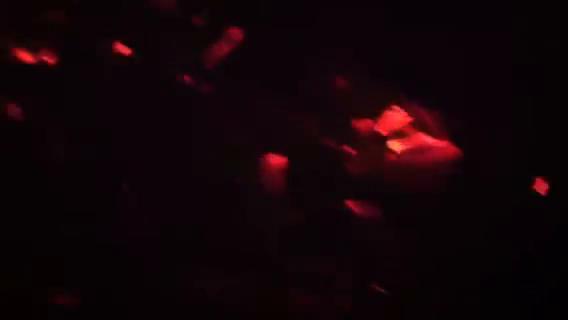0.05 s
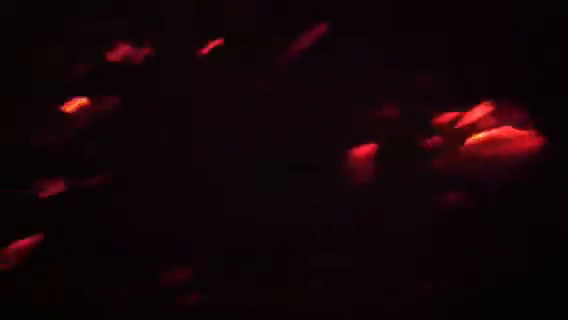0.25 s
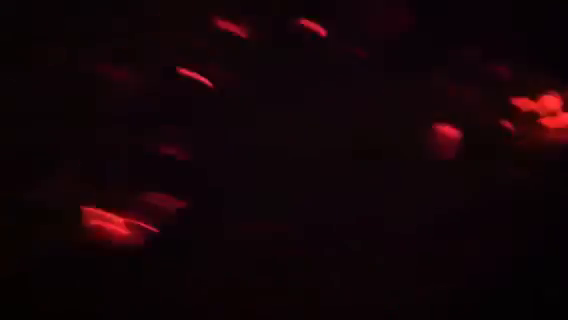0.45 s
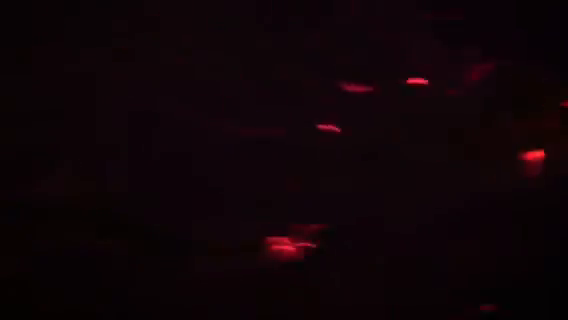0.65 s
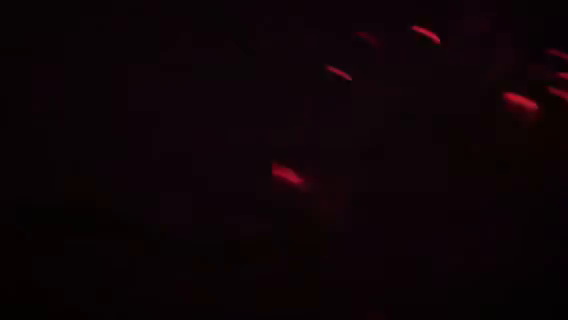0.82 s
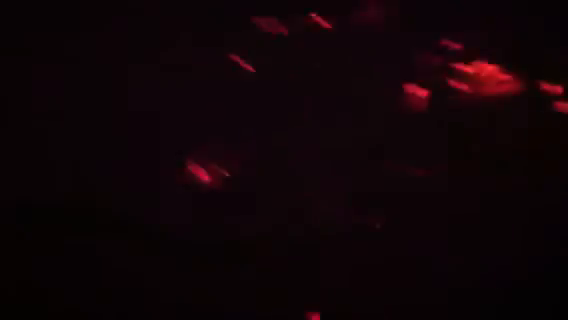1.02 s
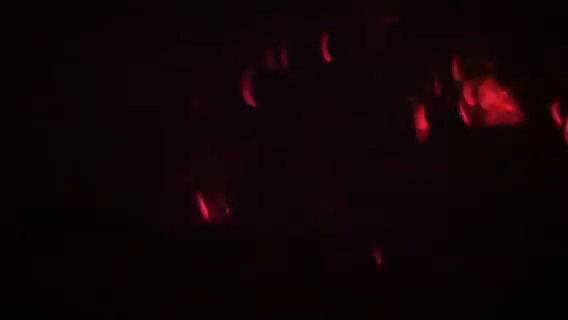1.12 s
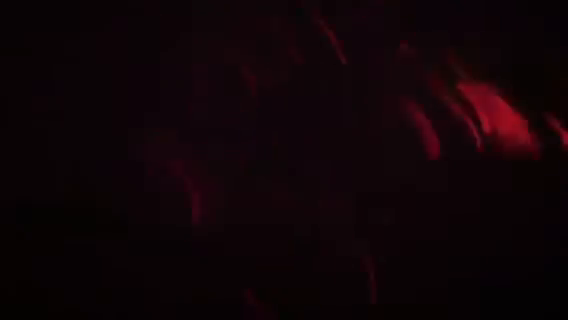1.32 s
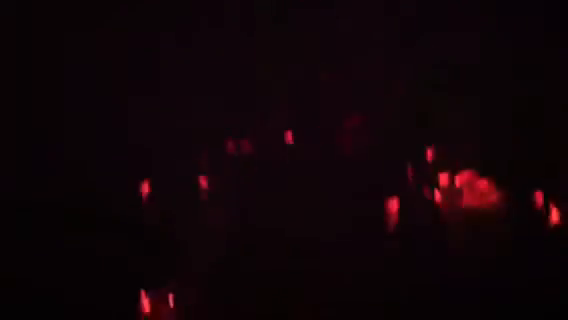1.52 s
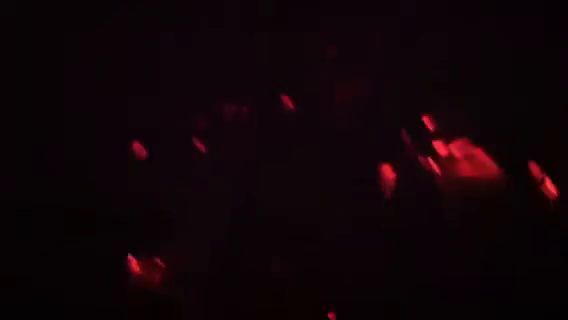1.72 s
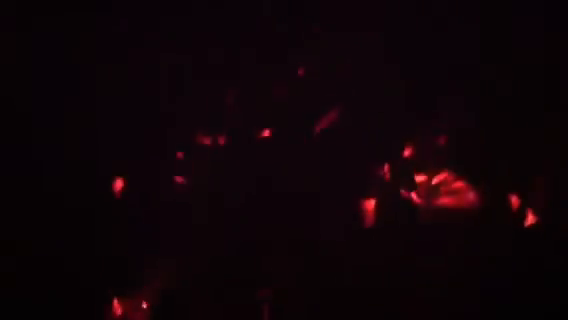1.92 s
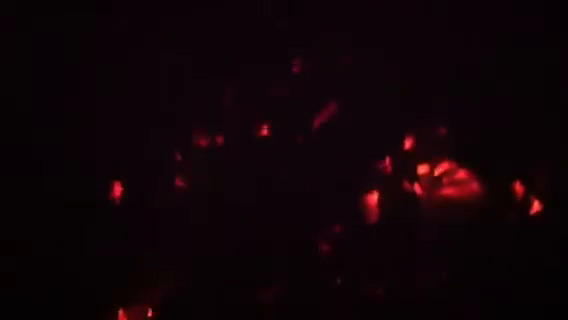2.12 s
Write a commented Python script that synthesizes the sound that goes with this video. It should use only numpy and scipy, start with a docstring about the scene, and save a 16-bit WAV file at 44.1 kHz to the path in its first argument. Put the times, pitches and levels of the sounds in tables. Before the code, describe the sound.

A short rumbling rub on the microphone, then soft swishes and faint ember ticks.

```python
"""Glowing embers at night. A distant low drone is there from the start, and a thin outdoor hiss comes up
over the first second. Almost at once something drags over the body of a hand-held camera: it sticks and
slips in one short, rumbling rub that brightens and lets go with a click. Soft swishes follow, probably
a sleeve. From 0.7 seconds on the embers tick as they crack, and the last tick comes just before the end."""
import sys
import numpy as np
from scipy import signal
from scipy.fft import rfft, irfft, next_fast_len
from scipy.io import wavfile
from scipy.ndimage import map_coordinates

SR = 44100
rng = np.random.default_rng(int(sys.argv[2]) if len(sys.argv) > 2 else 0)


def unload_wav(signal):
    """Save mono or channel-first audio to the path in sys.argv[1] as 16-bit WAV at rate SR, clipped to [-1, 1]."""
    wavfile.write(
        sys.argv[1],
        SR,
        np.round(np.clip(np.atleast_2d(signal).T, -1, 1) * 32767).astype(np.int16),
    )


N = 94815


def rub():
    """Something drags over the casing: coarse catches shake it, finer ones scrape and scuff."""
    # Each row: time in seconds, then relative levels in dB of the judder, the scrape and the scuff.
    levels = [(0.165, -68, -75, -95), (0.18, -39, -56, -69), (0.2, -32.5, -48.5, -62),
              (0.232, -37.5, -53, -69), (0.248, -19, -38, -52), (0.262, -22, -27, -41.5),
              (0.273, -23.5, -22.5, -40.5), (0.282, -28, -25, -41.5), (0.295, -13.5, -21.5, -33),
              (0.306, -25, -26, -31.5), (0.321, -36.5, -31.5, -32.5), (0.328, -22, -28.5, -37.5),
              (0.333, -40, -47, -56), (0.34, -48, -66, -67)]
    # The tone of the middle scrape and of the high scuff. Each row: frequency in Hz, level in dB.
    scrape_tone = [(200, -50), (550, 3), (800, -2.5), (1300, -2.5), (2400, -18.5), (3500, -34), (8000, -47)]
    scuff_tone = [(1000, -14.5), (2200, 5.5), (2900, 1), (4500, -6), (8000, -19), (11000, -32),
                  (15000, -44)]
    low_db, middle_db, high_db = curves(levels)
    t = np.arange(N) / SR
    touching = (t > levels[0][0]) & (t < levels[-1][0])
    rumble = amp(low_db - 1) * judder()
    scrape = amp(middle_db - 0.5) * friction(scrape_tone, rate=3400, scatter_db=0.5)
    scuff = amp(high_db + 0.5) * friction(scuff_tone, rate=5100, scatter_db=2.5)
    return touching * (rumble + scrape + scuff)


def judder():
    """The grip sticks and slips at an uneven pace, and each slip shakes the casing."""
    # The low tone of the shaking. Each row: frequency in Hz, level in dB.
    tone = [(25, -42), (50, -32), (85, -43), (130, 9.5), (190, 8), (260, 3.5), (410, -4), (600, -4.5),
            (900, -13.5), (1500, -58)]
    slips_per_second, uneven_db = 259, 0.5
    shift, size, turn = rng.standard_normal((3, N // 20))
    seconds = (np.arange(N // 20) + 0.35 * shift) / slips_per_second
    at = np.abs(seconds * SR).astype(int)
    push = amp(uneven_db * size)
    # Two parts, a quarter of a wave apart, let each shake start at its own point in the wave.
    along = np.bincount(at, push * np.cos(np.pi * turn), N)[:N]
    across = np.bincount(at, push * np.sin(np.pi * turn), N)[:N]
    return coloured(along + signal.hilbert(across).imag, tone)


def slips():
    """Each hard slip knocks the casing, which rings briefly at pitches that move with the grip."""
    # The hardest slips. Each row: time in seconds, peak in dB.
    hard_slips = [(0.1915, -32.5), (0.2083, -29), (0.2475, -17), (0.2591, -14), (0.271, -14),
                  (0.2753, -8.5), (0.2859, -12.5), (0.2950, -4.5), (0.2978, -12), (0.3027, -13),
                  (0.3271, -22), (0.3374, -24.5)]
    # How the casing rings. Each row: pitch in Hz, relative level in dB, seconds to fade by 60 dB.
    casing = [(228, -28, 0.028), (395, 13.5, 0.0092), (690, -1.5, 0.0099), (1500, -17, 0.0066)]
    rise_s, shift_octaves = 0.00064, 0.06
    pitch_shifts = 2 ** (shift_octaves * rng.standard_normal((len(hard_slips), len(casing))))
    t = np.arange(N) / SR
    out = np.zeros(N)
    for (start, db), shifts in zip(hard_slips, pitch_shifts):
        age = np.maximum(t - start + rise_s, 0)
        knock = sum(amp(level - 60 * age / fade_s) * np.sin(2 * np.pi * hz * shift * age)
                    for (hz, level, fade_s), shift in zip(casing, shifts))
        knock *= 1 - np.exp(-age / rise_s)
        out += amp(db) * knock / np.abs(knock).max()
    return out


def release():
    """The grip lets go with one dry click."""
    # The tone of the click. Each row: frequency in Hz, level in dB.
    tone = [(300, -3), (700, 8), (1500, 0), (3000, -8), (4200, -43), (6500, -27), (11000, -38),
            (15000, -55)]
    start_s, peak_db, fade_s = 0.3367, -25.5, 0.0029
    age = np.arange(N) / SR - start_s
    fade = (age >= 0) * amp(-60 * np.abs(age) / fade_s)
    click = coloured(rng.standard_normal(N) * fade, tone)
    return amp(peak_db) * click / np.abs(click).max()


def ticks():
    """An ember cracks: a sharp snap, then a short crumbling that rings around one pitch."""
    # Each row: start in seconds, relative peak in dB, pitch in Hz, seconds to fade by 60 dB,
    # width in octaves. Wide ticks sound dry.
    cracks = [(0.7035, -41.5, 4310, .03, .1), (0.7195, -47, 5300, .03, .22),
              (0.7333, -44, 5170, .007, 0.32), (0.8008, -39.5, 4930, .003, .5),
              (0.938, -35.5, 2010, 0.023, 0.22), (0.9387, -35, 2900, .014, 0.38),
              (0.9574, -39.5, 2010, 0.02, 0.25), (0.9667, -46.5, 2000, 0.022, .2),
              (1.0988, -42, 2300, .018, .3), (1.099, -41.5, 4280, 0.0091, .2),
              (1.199, -38.5, 4200, 0.015, .15), (1.5214, -36.5, 3530, 0.0032, 0.27),
              (1.5215, -40.5, 4200, 0.015, 0.16), (1.5495, -40.5, 510, .008, 0.37),
              (2.0965, -43, 6400, 0.0019, 0.27)]
    snap_size, broad_db = 5.2, -18
    t = np.arange(SR // 8) / SR
    lead = SR // 100  # room for the filter to ring ahead of the snap
    out = np.zeros(N + SR)
    for start, db, pitch, fade_s, width in cracks:
        crumbling = rng.standard_normal(len(t)) * amp(-60 * t / fade_s)
        crack = np.pad(crumbling + snap_size * (t == 0), (lead, 0))
        ring = lambda hz: hump(hz, pitch, width) + amp(broad_db) * hump(hz, pitch, octaves=0.51)
        tick = filtered(crack, ring)
        at = round(start * SR) - lead
        out[at:at + len(tick)] += amp(db + 1.5) * tick / np.abs(tick).max()
    return out[:N]


def sizzle():
    """The glowing bed gives off sparse, tiny crackles."""
    # Their bright tone. Each row: frequency in Hz, level in dB.
    tone = [(3000, -17), (5000, -10), (8000, -1), (12000, -4), (15000, -22)]
    level_db, rise_s = -86.5, 0.84
    rise = np.clip(np.arange(N) / SR / rise_s, 0, 1) ** 2
    return amp(level_db) * rise * friction(tone, rate=60, scatter_db=2)


def swishes():
    """Cloth slides in swells: a fine hiss with a sheen on top, and a lower brushing where it presses."""
    # Each row: middle in seconds, half length in seconds, relative levels in dB of the hiss
    # and the brushing, extra sheen in dB.
    strokes = [(0.122, 0.021, -75.5, -68, -2), (0.41, 0.07, -68, -60.5, 2), (0.538, 0.023, -64, -68.5, 0),
               (0.594, 0.016, -64.5, -61, -2), (0.735, 0.064, -60.5, -57, -3),
               (0.806, 0.023, -64.5, -63.5, -5), (0.93, 0.025, -47, -55.5, 0.5),
               (1.002, 0.015, -49, -55.5, -1), (1.051, 0.022, -48, -57.5, -4),
               (1.133, 0.018, -50.5, -71, 3.5), (1.197, 0.029, -45, -45.5, 3), (1.25, 0.025, -68, -68, -6),
               (1.316, 0.021, -60, -51.5, 4.5), (1.426, 0.039, -64.5, -61, 3)]
    # The tones of the hiss, the brushing and the sheen. Each row: frequency in Hz, level in dB.
    hiss_tone = [(2000, -30), (3200, -5), (4600, 1.5), (5400, -2), (7200, 0), (9500, -2), (11500, -9),
                 (15500, -69)]
    brush_tone = [(200, 4.5), (550, 1), (1200, 0.5), (2300, -1.5), (4300, -8.5), (6500, -16.5),
                  (12000, -65)]
    sheen_tone = [(8000, -6), (11000, 4.5), (13500, -3.5), (15600, -9)]
    hiss, brush, sheen = np.zeros((3, N))
    for middle_s, half_s, hiss_db, brush_db, sheen_db in strokes:
        shape = swell(middle_s, half_s)
        hiss += amp(hiss_db - 1.5) * shape
        brush += amp(brush_db) * shape
        sheen += amp(hiss_db + sheen_db - 10) * shape
    hiss *= friction(hiss_tone, rate=15000, scatter_db=2.5)
    brush *= friction(brush_tone, rate=5000, scatter_db=0)
    sheen *= noise(sheen_tone)
    flicker_db = 1.03 * wobble(rate=90.02)
    return (hiss + brush + sheen) * amp(flicker_db)


def faint_patches():
    """Brief, faint patches of noise, each around one pitch; one near 1 second is a very high, airy hiss."""
    # Each row: middle in seconds, half length in seconds, level in dB, pitch in Hz.
    patches = [(0.117, 0.019, -63, 1190), (1.01, 0.016, -56, 15000), (1.017, 0.018, -47.5, 7250),
               (1.774, 0.0093, -53, 885), (2.125, 0.07, -70, 6500)]
    out = np.zeros(N)
    for middle_s, half_s, db, pitch in patches:
        band = filtered(rng.standard_normal(N), lambda hz: hump(hz, pitch, octaves=0.27))
        out += amp(db) * swell(middle_s, half_s) * unit(band)
    return out


def outdoors():
    """A distant drone with a wavering hum, under a soft rush and a thin hiss."""
    # Each row: time in seconds, then relative levels in dB of the drone, the rush and the hiss.
    air_levels = [(0, -57, -73.5, -81), (0.17, -55.5, -67, -75.5), (0.36, -51, -62.5, -78.5),
                  (0.62, -50, -60.5, -66), (0.89, -49, -60.5, -60.5), (1.09, -49, -56, -58),
                  (1.36, -48.5, -56.5, -59), (1.72, -51.5, -56.5, -60), (2.15, -49, -58, -59.5)]
    # How the hum swells and sinks. Each row: time in seconds, level in dB.
    hum_levels = [(0, -81), (0.5, -57), (0.85, -56), (1.15, -55.5), (1.33, -50.5), (1.48, -45),
                  (1.7, -60.5), (1.81, -46.5), (1.92, -55.5), (2.1, -52.5)]
    # The tones of the low drone, middle rush and high hiss. Each row: frequency in Hz, level in dB.
    drone_tone = [(25, -28), (55, -20), (78, -11), (100, -10), (130, -0.5), (160, 2.5), (210, 2.5),
                  (290, -6.5), (345, -4), (450, -24.5), (900, -70)]
    rush_tone = [(200, -38), (400, -1.5), (580, -2), (900, -8.5), (1300, -12), (2500, -59)]
    hiss_tone = [(500, -5), (1100, -3), (1600, 1), (2000, 2.5), (2600, 2.5), (3200, -5.5), (4600, -8),
                 (5300, -18), (9000, -22), (12000, -31), (15500, -64)]
    hum_hz, wander_hz = 213.5, 2.71
    drone_db, rush_db, hiss_db = curves(air_levels)
    hum_db, = curves(hum_levels)
    phase = 2 * np.pi * np.cumsum(hum_hz + wander_hz * wobble(rate=14)) / SR
    hum = np.sqrt(2) * amp(hum_db + 0.27 * wobble(rate=17.5)) * np.sin(phase)
    drone = amp(drone_db + 0.5) * noise(drone_tone)
    rush = amp(rush_db - 1.5) * noise(rush_tone)
    hiss = amp(hiss_db + 1) * noise(hiss_tone)
    return hum + drone + rush + hiss


def microphone_hiss():
    """The microphone adds a faint, steady hiss of its own."""
    # Each row: frequency in Hz, level in dB.
    tone = [(2500, -4), (5000, 4), (9000, -2), (12000, -8), (15500, -30)]
    return amp(-80) * noise(tone)


def friction(tone, rate, scatter_db):
    """Tiny catches at random moments, about rate a second, their sizes spread by scatter_db."""
    chance, size, sign = rng.random(N), rng.standard_normal(N), rng.choice([-1, 1], N)
    catches = (chance < rate / SR) * sign * amp(scatter_db * size)
    return coloured(catches, tone)


def noise(tone):
    """Smooth noise with the given tone, at strength 1."""
    return coloured(rng.standard_normal(N), tone)


def coloured(x, tone):
    """Shape a sound by rows of frequency in Hz and level in dB, then bring it to strength 1."""
    row_hz, row_db = np.transpose(tone)
    gain = lambda hz: amp(np.interp(np.log(hz + 1), np.log(row_hz), row_db, left=-120, right=-120))
    return unit(filtered(x, gain))


def filtered(x, gain):
    """Turn each frequency of a sound up or down by gain(hz)."""
    size = next_fast_len(len(x) + SR // 4)
    hz = np.fft.rfftfreq(size, 1 / SR)
    return irfft(rfft(x, size) * gain(hz), size)[:len(x)]


def swell(middle_s, half_s):
    """A smooth rise and fall, about half as high at half_s before and after its middle."""
    distance = np.abs((np.arange(N) / SR - middle_s) / half_s)
    return np.exp(-0.7 * distance ** 1.63)


def hump(hz, pitch, octaves):
    """A bell-shaped curve around a pitch; octaves sets its width."""
    return np.exp(-(np.log2((hz + 1) / pitch) / octaves) ** 2 / 2)


def wobble(rate):
    """A smooth curve through rate random values a second."""
    return map_coordinates(rng.standard_normal(N // 20), [np.arange(N) * rate / SR], mode="wrap")


def curves(rows):
    """Join timed rows with straight lines: one curve for each column after the time."""
    seconds, *columns = np.transpose(rows)
    return [np.interp(np.arange(N) / SR, seconds, column) for column in columns]


def unit(x):
    """Bring a sound to an average strength (root mean square) of 1."""
    return x / np.sqrt(np.mean(x ** 2) + 1e-20)


def amp(db):
    """Turn decibels into a number to multiply by."""
    return 10 ** (np.asarray(db) / 20)


def scene():
    """All the sounds added together in one channel."""
    foreground = rub() + slips() + release() + swishes() + faint_patches() + ticks() + sizzle()
    return (foreground + outdoors() + microphone_hiss())[None]


def record(dry):
    """The camera thins the deep bass and cuts off the highest treble."""
    low_cut_hz, top_hz = 103, 15750
    gain = lambda hz: (hz < top_hz) * hz ** 2 / np.hypot(hz ** 2, low_cut_hz ** 2)
    return np.array([filtered(channel, gain) for channel in dry])


dry = scene()
out = record(dry)
unload_wav(out)
```